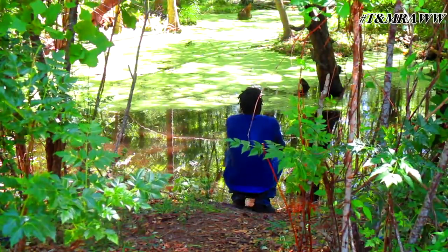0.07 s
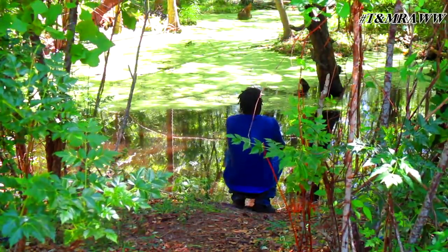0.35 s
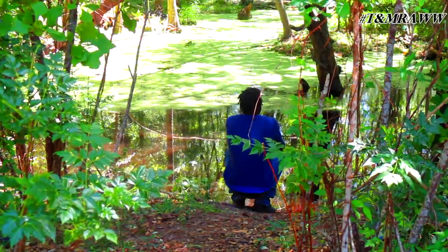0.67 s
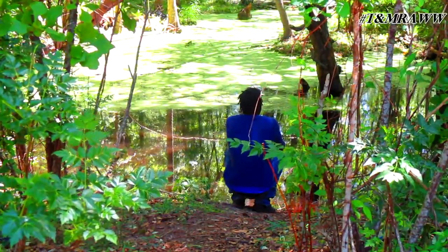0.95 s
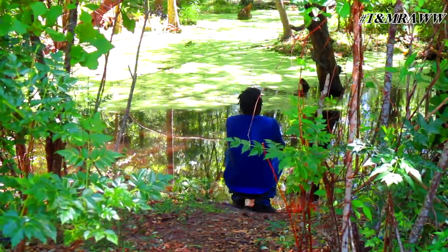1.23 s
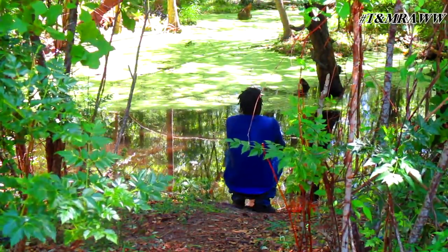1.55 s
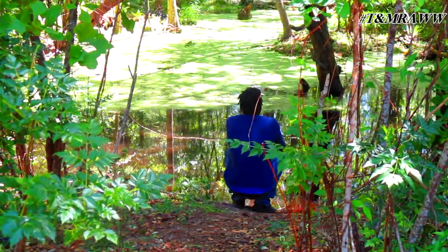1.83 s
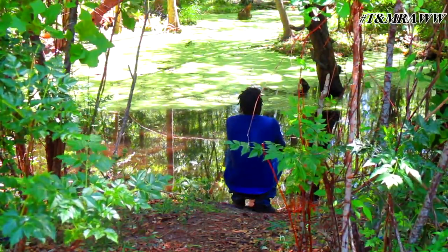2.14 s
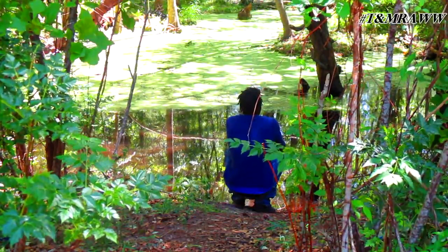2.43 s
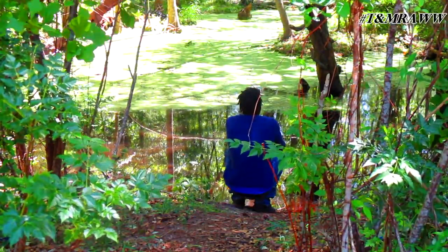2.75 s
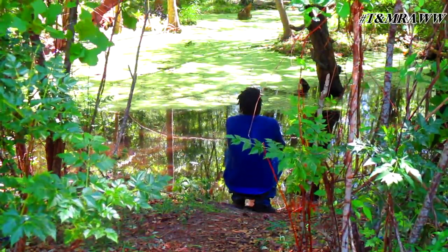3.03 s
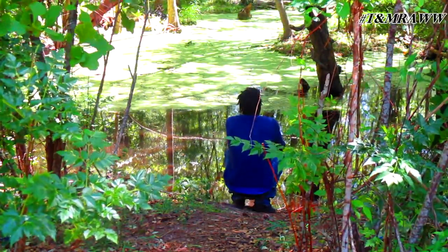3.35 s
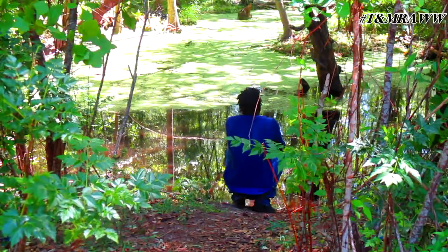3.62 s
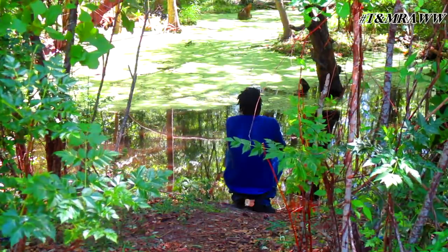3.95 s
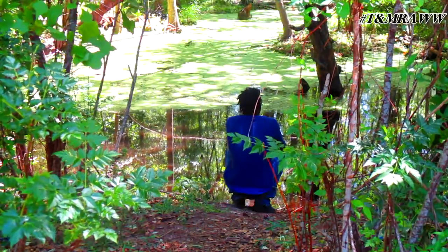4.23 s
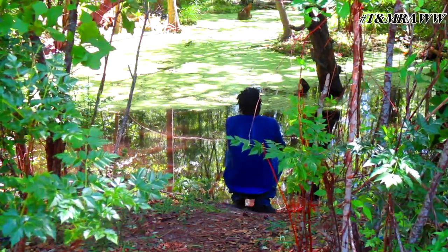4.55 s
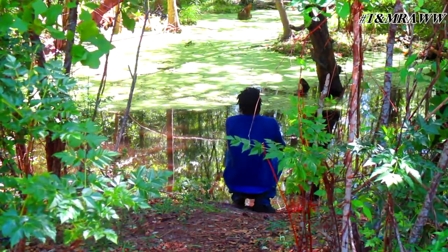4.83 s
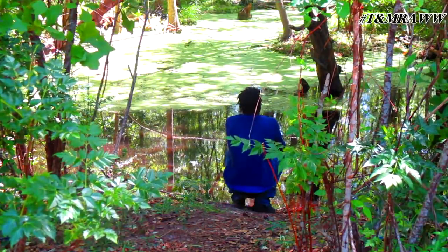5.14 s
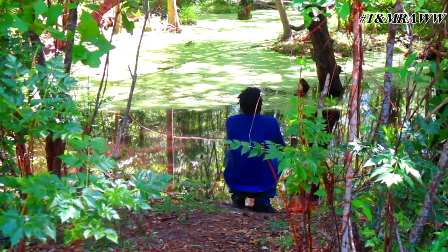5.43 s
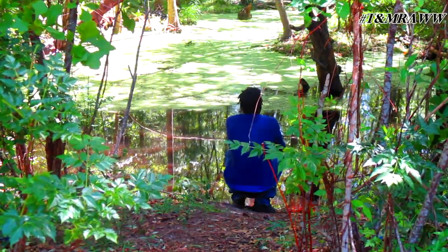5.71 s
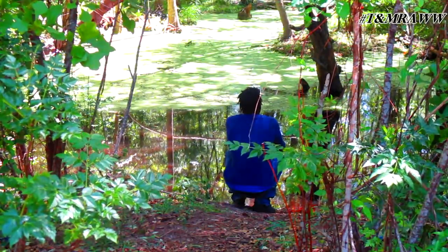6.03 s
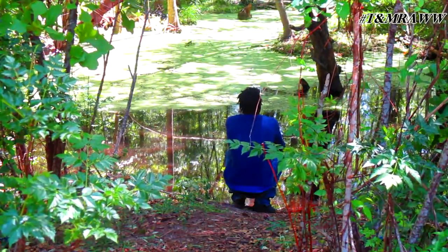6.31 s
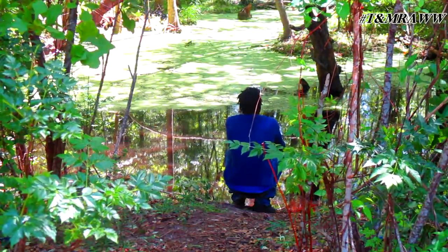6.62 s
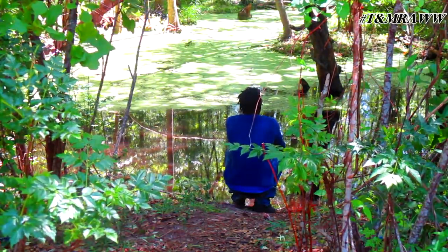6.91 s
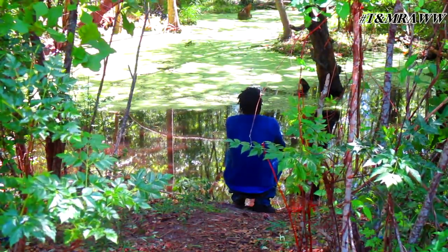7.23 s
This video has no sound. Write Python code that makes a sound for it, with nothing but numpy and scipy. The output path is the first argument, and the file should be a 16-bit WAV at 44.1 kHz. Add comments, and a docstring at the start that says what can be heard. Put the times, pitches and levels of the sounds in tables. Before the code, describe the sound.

Birds call at the wooded edge of a swamp, each call echoing briefly among the trunks. A soft steady wash and a faint, high katydid buzz lie underneath. Low puffs of wind thump and rumble on the microphone throughout, stronger than the birds, most of all in the first half second and near 3 seconds. A songbird gives a sinking whistle at about 1.1 seconds, a few quick chirps, then six rising notes with high hooked ends from 1.8 to 4 seconds. From 3.8 to 5.8 seconds a water bird gives six evenly spaced, hoarse yelps, each leaping up in pitch and sagging. Short nasal clucks come at about 0.5, 1.7, 2.7, 5.4 and 6.5 seconds. Faint distant birds slide in pitch now and then, notably around 3.5 seconds. The songbird whistles again at 7 seconds, followed by a small chirp.

```python
"""The wooded edge of a swamp

A songbird whistles sliding phrases, a water bird gives a run of yelps that rise and fall, and short
nasal clucks come in between. Every call echoes among the trunks. Katydids (bush crickets) scrape their
wings in a buzz near 8 kHz, while puffs of air thump on the microphone over the soft wash of the woods."""
import sys
import numpy as np
from scipy import signal
from scipy.fft import rfft, irfft
from scipy.io import wavfile
from scipy.ndimage import uniform_filter1d

SR = 44100
rng = np.random.default_rng(int(sys.argv[2]) if len(sys.argv) > 2 else 0)


def persist_wave(psi):
    """Save psi, clipped to +-1, as 16-bit WAV."""
    counts = np.round(np.clip(psi, -1, 1) * 32767).astype(np.int16)
    wavfile.write(sys.argv[1], SR, np.atleast_2d(counts).T)


N = 320428
TIME = np.arange(N) / SR


def songbird(whistle_s=.2, top_hz=3368, sag_hz=331.6, attack_s=.06, fade_db_per_s=45,
             rise_s=.125, hook_s=.044):
    """Nearly pure whistles; each syllable leaps from the low side of the voice organ to the high one."""
    # long, sinking whistles: t/s, level/dB
    whistles = [(1.092, -51), (6.995, -51)]
    # short, even slides: t/s, length/s, first f/Hz, last f/Hz, level/dB
    slides = [(0.06, 0.042, 3180, 3450, -64), (1.015, 0.047, 2004, 2180, -63.5),
              (1.317, 0.026, 3860, 3530, -56.5), (1.318, 0.0325, 2994, 2500, -49.5),
              (1.371, 0.031, 2370, 1835, -55.5), (1.42, 0.031, 2434, 3720, -48),
              (1.493, 0.0294, 2605, 1990, -52), (1.552, 0.033, 1977, 2063, -56.5),
              (7.232, 0.031, 2950, 2460, -58)]
    # syllables, a slow rise then a high hook: hook t/s, rise level/dB, hook level/dB, hook f/Hz
    syllables = [(1.961, -53.5, -52, 3705), (2.374, -53, -53, 3796), (2.769, -53.5, -52, 3594),
                 (3.184, -53, -57, 3640), (3.6, -60, -55.5, 3660), (4.005, -55, -56.5, 3650)]
    # course of the rise: share of length, f/Hz, level/dB
    rise_shape = [(0, 1561, -7.5), (.45, 1863, -8.5), (.75, 2130, 1.5), (1, 2167, -18)]
    # course of the hook: share of length, pitch ratio, level/dB
    hook_shape = [(0, .9, -2), (.22, .99, 0), (.5, 1, -1), (1, 1, -7)]
    out = np.zeros(N)
    for start, db in whistles:
        share = progress(whistle_s)
        t = share * whistle_s
        attack = np.minimum(t / attack_s, 1) ** .5
        gain = attack * from_db(db - fade_db_per_s * np.maximum(t - attack_s, 0))
        hz = top_hz - sag_hz * share ** 1.4
        add(out, start, syrinx(hz, [gain], jitter=.018, edge=.1))
        # the organ's other side sounds faintly below the whistle
        add(out, start, syrinx(.738 * hz, [from_db(-16) * gain], jitter=.011, edge=.43))
    for start, length, first_hz, last_hz, db in slides:
        hz = first_hz * (last_hz / first_hz) ** progress(length)
        add(out, start, syrinx(hz, [from_db(db)], jitter=.027, edge=.26))
    for start, rise_db, hook_db, hook_hz in syllables:
        hz, swell_db = follow(rise_shape, progress(rise_s))
        add(out, start - rise_s, syrinx(hz, [from_db(rise_db + swell_db)], jitter=.02, edge=.14))
        ratio, swell_db = follow(hook_shape, progress(hook_s))
        add(out, start, syrinx(hook_hz * ratio, [from_db(hook_db + swell_db)], jitter=.016, edge=.15))
    return out


def water_bird_yelps(rasp_db=-1):
    """The pitch leaps and sags, sweeping its harmonics through an unmoving throat; both ends are hoarse."""
    # yelps: t/s, length/s, top f/Hz, level/dB, boost of harmonic 1/dB, boost step for upper ones/dB
    calls = [(3.835, 0.14, 1442, -51, -4, -3), (4.16, 0.15, 1399, -54, -2.5, 0),
             (4.503, .16, 1410, -52.5, -2, 0), (4.878, 0.18, 1421, -52.5, -4, 2.5),
             (5.247, .18, 1426, -52, -3.5, 1), (5.622, 0.18, 1393, -50.5, -5, 0)]
    # course of one yelp: share of length, pitch ratio, level/dB, hoarseness 0-1
    arch = [(0, .5, -10, .7), (.11, .66, -3, .6), (.18, .88, -1, .3), (.27, .995, 1.5, .1),
            (.38, .99, 3, .1), (.53, .935, 2, .2), (.68, .87, -.5, .6), (.84, .76, -2.5, .9),
            (1, .66, -7, .95)]
    # how well the throat passes each frequency: f/Hz, level/dB
    throat = [(500, -5), (950, -3.5), (1400, -4), (1900, -4.5), (2350, -4.5), (2750, 1), (3300, -6),
              (4200, -13), (5500, -20), (7000, -26), (9000, -27)]
    out = np.zeros(N)
    harmonic = np.arange(1, 9)[:, None]
    rasp = coloured_noise(throat)
    for start, length, top_hz, db, low_db, bright_db in calls:
        ratio, swell_db, hoarse = follow(arch, progress(length))
        hz = top_hz * ratio
        size = len(hz)
        tone_db = low_db * (harmonic == 1) + bright_db * np.clip(harmonic - 2, 0, 2)
        # each harmonic flickers on its own; hoarseness trades the upper ones for rasp
        flicker_db = np.array([drift(110, size) for _ in harmonic]) * (2.5 + 1.5 * (harmonic > 2))
        loss_db = 3.5 * hoarse * np.clip(harmonic - 1, 0, 2)
        gains = gain_at(throat, harmonic * hz) * from_db(db + swell_db + tone_db + flicker_db - loss_db)
        wobble = 1 + (.006 + .02 * hoarse) * drift(90, size)
        add(out, start, syrinx(hz * wobble, gains, jitter=.006 + .06 * hoarse, edge=.12))
        breath = rasp[int(start * SR):][:size] * signal.windows.tukey(size, .2)
        add(out, start, from_db(db + swell_db + rasp_db) * hoarse * breath)
    return out


def water_bird_clucks(throat_width_hz=330, body_hz=2400, body_db=-12, hiss_db=-16):
    """Short reedy bursts: many harmonics and a rasp, strongest where the throat rings."""
    # clucks: t/s, length/s, first f/Hz, fall/octaves, level/dB, throat f/Hz, rasp 0-1
    calls = [(.461, 0.019, 513, 0.032, -46, 1330, 0.89), (.463, 0.011, 510, -0.24, -56, 4080, 0.5),
             (0.471, 0.049, 489, 0.15, -52, 2400, 0.9), (1.706, 0.03, 1348, 0.066, -46.5, 2580, 0.65),
             (1.706, 0.0317, 1380, 0.12, -50.5, 1370, 0.67), (2.651, 0.033, 1743, 0.53, -46.5, 2960, 0.56),
             (4.271, 0.017, 1057, 0.064, -58, 2100, 0.2), (5.427, 0.0265, 1616, 0.39, -46, 2600, 0.68),
             (6.547, 0.02, 545, 0.11, -46, 2960, 0.08), (6.568, 0.016, 481, 0.31, -50, 2089, 0.43)]
    out = np.zeros(N)
    for start, length, first_hz, fall, db, throat_hz, rasp in calls:
        hz = first_hz * 2 ** (-fall * progress(length))
        harmonics_hz = np.arange(1, int(10000 / first_hz))[:, None] * hz
        throat = 1 / (1 + ((harmonics_hz - throat_hz) / throat_width_hz) ** 2)
        gains = throat + from_db(body_db) / np.hypot(1, harmonics_hz / body_hz)
        gains /= np.sqrt(np.mean(np.sum(gains ** 2, axis=0)))
        reed = syrinx(hz, gains, jitter=.042 * rasp, edge=.1)
        noise = rng.standard_normal(len(hz))
        hiss = from_db(hiss_db) * resonate(noise, 5500, width_hz=4000)
        breath = unit_level(resonate(noise, throat_hz, width_hz=1300) + hiss)
        breath *= signal.windows.tukey(len(hz), .5)
        add(out, start, from_db(db) * (np.sqrt(1 - rasp ** 2) * reed + rasp * breath))
    return out


def far_birds():
    """Faint, hoarse slides in pitch from far off."""
    # calls: t/s, length/s, first f/Hz, last f/Hz, level/dB
    calls = [(.35, 0.036, 5120, 5020, -66), (0.913, 0.059, 5240, 4980, -62), (3.479, 0.15, 1540, 2454, -58),
             (3.417, 0.17, 1100, 1605, -63.5), (3.492, 0.131, 2825, 2610, -62.5),
             (6.837, 0.039, 6200, 6050, -62), (7.221, 0.044, 3920, 3500, -58)]
    out = np.zeros(N)
    for start, length, first_hz, last_hz, db in calls:
        hz = first_hz + (last_hz - first_hz) * progress(length)
        add(out, start, syrinx(hz, [from_db(db)], jitter=.05, edge=.24))
    return out


def syrinx(hz, gains, jitter, edge):
    """A bird's voice organ: harmonics (whole multiples) of an unsteady pitch, faded in and out."""
    phase = 2 * np.pi * np.cumsum(hz * (1 + jitter * drift(721, len(hz)))) / SR
    tone = sum(gain * np.sin(k * phase) for k, gain in enumerate(gains, 1))
    return np.sqrt(2) * tone * signal.windows.tukey(len(hz), edge)


def katydids(farther_db=-5, fade_s=.056):
    """A near katydid with uneven strokes, a farther one on the same pitch, and a higher third."""
    # when the first two sing: start t/s, end t/s, level/dB
    pair_spells = [(0, 4.3, -61), (4.3, 6.1, -63.5), (6.33, 7.4, -63)]
    # when the high one sings: start t/s, end t/s, level/dB
    high_spells = [(1.3, 2.7, -79), (2.7, 4.32, -70), (4.32, 6.12, -79), (6.12, 7.4, -72)]
    near = wing_buzz(pitch_ratio=1, strokes_per_s=53.3, unevenness=.17)
    farther = wing_buzz(pitch_ratio=1, strokes_per_s=66.7, unevenness=.02)
    high = wing_buzz(pitch_ratio=1.046, strokes_per_s=84.4, unevenness=.02)
    pair = unit_level(near + from_db(farther_db) * farther)
    return spells(pair_spells, fade_s) * pair + spells(high_spells, fade_s) * high


def wing_buzz(pitch_ratio, strokes_per_s, unevenness, sounding_share=.63):
    """Each wing closing scrapes a row of teeth: a short tone that rises, then drops as the wing slows."""
    # course of one stroke: share of length, f/Hz, level/dB
    stroke = [(0, 7750, -11), (.25, 8060, -2), (.45, 8200, 0), (.65, 8060, -2), (.82, 7770, -6),
              (1, 7500, -10)]
    out = np.zeros(N)
    hz, swell_db = follow(stroke, progress(sounding_share / strokes_per_s))
    phase = 2 * np.pi * np.cumsum(hz * pitch_ratio) / SR
    shape = from_db(swell_db) * signal.windows.tukey(len(hz), .2)
    gaps, forces, speeds, offsets = rng.standard_normal((800, 4)).T
    starts = np.cumsum(np.maximum(1 + unevenness * gaps, .5)) / strokes_per_s
    for start, force, speed, offset in zip(starts, forces, speeds, offsets):
        tone = np.sin(phase * (1 + .004 * speed) + np.pi * offset)
        add(out, start, shape * from_db(1.5 * force) * tone)
    return unit_level(out)


def wind(breeze_db=-55, lumpy_db=3, puff_boost_db=.5):
    """Churning air rumbles; each single swirl swings the pressure once as it crosses the microphone."""
    # gusts: start t/s, end t/s, level/dB
    gusts = [(0.04, .4, -36.5), (.4, .58, -47), (1.62, 1.84, -47.5), (1.84, 2.03, -38.5),
             (2.13, 2.24, -41.5), (2.31, 2.41, -43), (2.56, 2.68, -44.5), (2.82, 3.0, -42.5),
             (3.79, 3.92, -49), (4.25, 4.31, -41.5), (4.4, 4.56, -42), (4.63, 4.77, -48), (5.33, 5.45, -41),
             (6.55, 6.63, -48), (6.72, 6.85, -42.5)]
    # tone colour of the rumble: f/Hz, relative level/dB
    rumble = [(15, -22), (28, -2), (55, 5.5), (85, -3.5), (130, -6), (200, -12.5), (320, -31), (1200, -100)]
    # the strongest puffs of air: t/s, level/dB
    puffs = [(0.013, -25), (0.132, -19.5), (0.321, -20.5), (0.378, -19), (0.556, -26), (0.76, -40.5),
             (1.635, -31), (1.713, -26.5), (1.889, -26), (2.01, -23.5), (2.205, -24.5), (2.386, -30),
             (2.575, -28.5), (2.837, -25.5), (2.962, -16), (3.231, -34.5), (3.588, -33), (4.257, -29),
             (4.464, -22.5), (4.502, -27.5), (4.679, -31), (5.405, -23.5), (5.561, -33), (5.749, -26),
             (5.84, -28), (6.735, -24.5), (6.8, -29.5), (7.17, -28)]
    flow = from_db(breeze_db) + spells(gusts, fade_s=.033)
    out = flow * from_db(lumpy_db * drift(25, N)) * coloured_noise(rumble)
    t = np.arange(-SR // 40, SR // 40) / SR
    usual_db = np.mean([db for _, db in puffs])
    for middle, db in puffs:
        speed = 70 * 2 ** (.041 * (db - usual_db))   # strong swirls pass faster and sound higher
        swing = np.pi * speed * t
        thump = np.exp(-.55 * swing ** 2) * np.cos(2.22 * swing + rng.uniform(-1.7, 1))
        add(out, middle + t[0], from_db(db + puff_boost_db) * thump)
    return out


def among_trees(sound, echo_db, decay_s, build_s, tail_db=-23, dull_hz=7000):
    """Trunks and leaves scatter a sound into echoes, with a faint long tail from the far bank."""
    t = TIME[:SR]
    far_bank = from_db(tail_db - 30 * t)
    shape = (1 - np.exp(-t / build_s)) * (from_db(-60 * t / decay_s) + far_bank)
    spectrum = rfft(rng.standard_normal(SR) * shape)
    spectrum /= np.sqrt(uniform_filter1d(np.abs(spectrum) ** 2, size=90))   # no pitch is favoured
    echoes = irfft(spectrum, SR)[t < .9]
    heard = sound + from_db(echo_db) * signal.fftconvolve(sound, echoes)[:N]
    return signal.sosfilt(signal.butter(3, dull_hz, fs=SR, output="sos"), heard)   # leaves soak up treble


def distant_woods(level_db=-52):
    """The soft, steady wash of the woods far away."""
    # tone colour of the wash: f/Hz, relative level/dB
    wash = [(30, 5.5), (120, -4), (250, -2.5), (500, -6), (1000, -11), (2000, -16.5), (4000, -20),
            (7000, -22.5), (9000, -24.5), (12000, -29.5), (15500, -36.5)]
    return from_db(level_db) * coloured_noise(wash)


def from_db(db):
    """Turn decibels into a gain to multiply by."""
    return 10 ** (np.asarray(db) / 20)


def unit_level(sound):
    """Scale a sound to an average power of 1."""
    return sound / np.sqrt(np.mean(sound ** 2) + 1e-20)


def progress(length):
    """Run from 0 to 1 over a note."""
    return np.linspace(0, 1, int(length * SR))


def follow(rows, at):
    """Read a table between its rows, along straight lines."""
    first, *columns = np.transpose(rows)
    return [np.interp(at, first, column) for column in columns]


def add(track, start_s, sound):
    """Mix a sound into a track at a given time."""
    start = max(int(start_s * SR), 0)
    track[start:start + len(sound)] += sound[:max(N - start, 0)]


def drift(points_per_s, size):
    """A wandering line through random points."""
    points = rng.standard_normal(4000)
    return np.interp(np.arange(size) / SR * points_per_s, np.arange(len(points)), points)


def gain_at(spectrum, hz):
    """Look up a tone colour's gain at any frequency."""
    points_hz, db = np.transpose(spectrum)
    return from_db(np.interp(np.log(hz + 1), np.log(points_hz), db))


def coloured_noise(spectrum):
    """Noise with a given tone colour and a power of 1."""
    gain = gain_at(spectrum, np.arange(N // 2 + 1) * SR / N)
    return unit_level(irfft(rfft(rng.standard_normal(N)) * gain, N))


def resonate(sound, hz, width_hz):
    """Let through a band around one frequency."""
    r = np.exp(-np.pi * width_hz / SR)
    feedback = [1, -2 * r * np.cos(2 * np.pi * hz / SR), r * r]
    return signal.lfilter(np.array([1, 0, -1]) * (1 - r * r) / 2, feedback, sound)


def spells(rows, fade_s):
    """A gain that swells, holds and dies away for each row."""
    gain = sum(from_db(db) * (TIME >= start) * (TIME < end) for start, end, db in rows)
    return uniform_filter1d(gain, size=int(fade_s * SR))


def scene():
    """Birds at several distances, over insects, wind and the wash of the woods."""
    song = among_trees(songbird(), echo_db=-1, decay_s=.6, build_s=.0073)
    yelps = among_trees(water_bird_yelps(), echo_db=-3.5, decay_s=.68, build_s=.015)
    clucks = among_trees(water_bird_clucks(), echo_db=-1, decay_s=.44, build_s=.0053)
    far = among_trees(far_birds(), echo_db=-2.5, decay_s=.62, build_s=.0064)
    insects = among_trees(katydids(), echo_db=-7, decay_s=.2, build_s=.01, dull_hz=14000)
    return (song + yelps + clucks + far + insects + wind() + distant_woods())[None]


def record(dry):
    """Cut the highest treble steeply, above 15.7 kHz."""
    return signal.sosfilt(signal.ellip(12, .1, 70, 15700, fs=SR, output="sos"), dry)


dry = scene()
out = record(dry)
persist_wave(out)
```